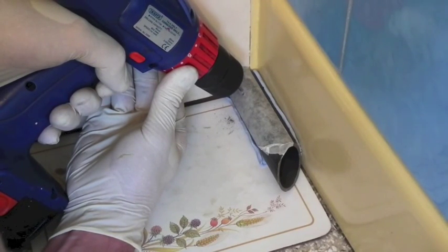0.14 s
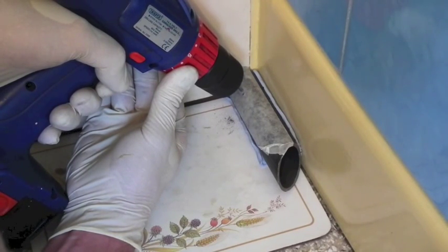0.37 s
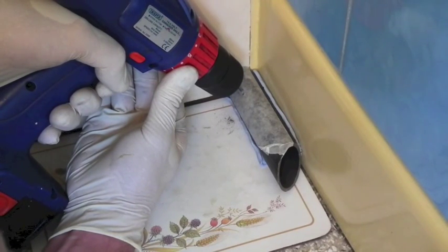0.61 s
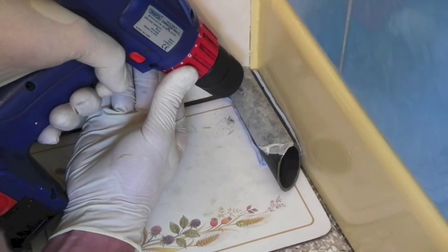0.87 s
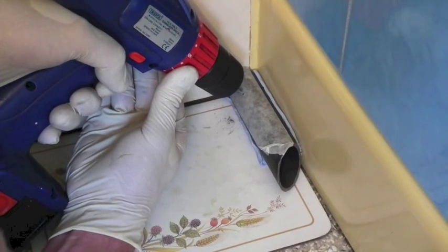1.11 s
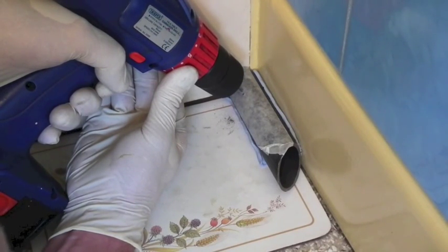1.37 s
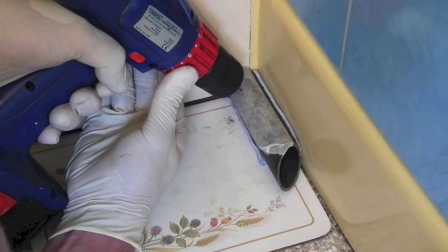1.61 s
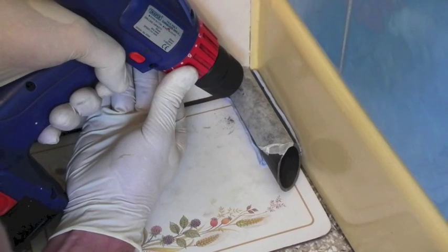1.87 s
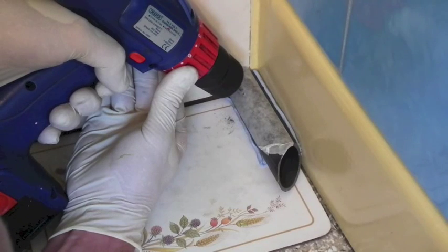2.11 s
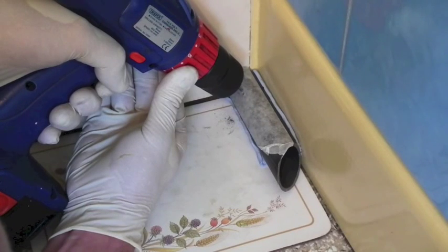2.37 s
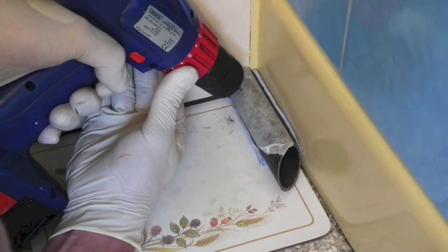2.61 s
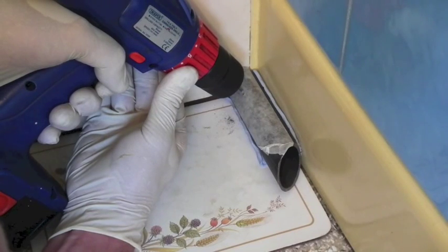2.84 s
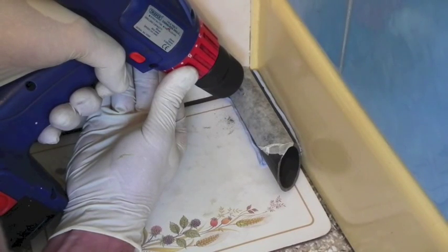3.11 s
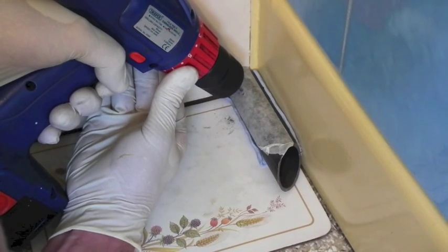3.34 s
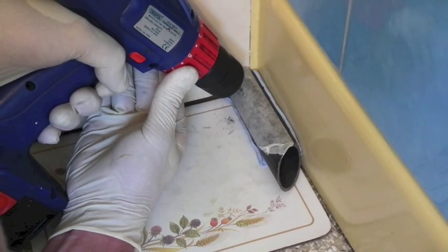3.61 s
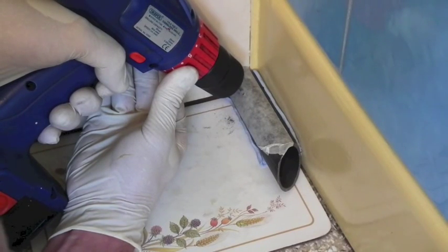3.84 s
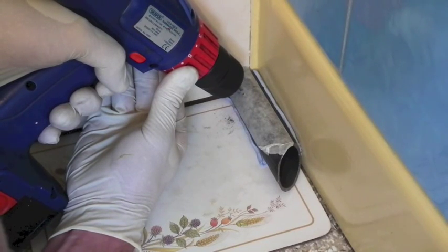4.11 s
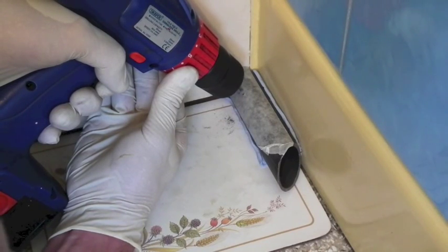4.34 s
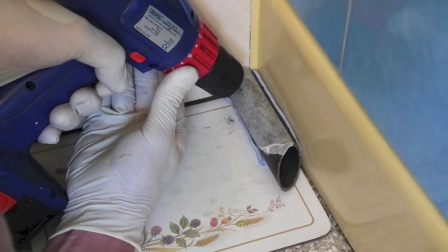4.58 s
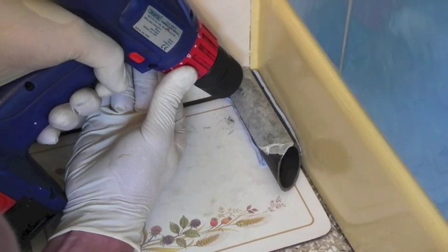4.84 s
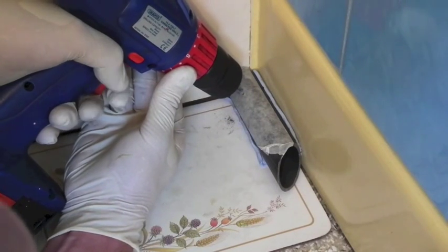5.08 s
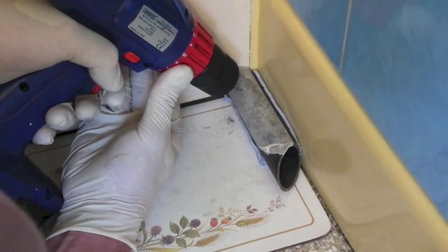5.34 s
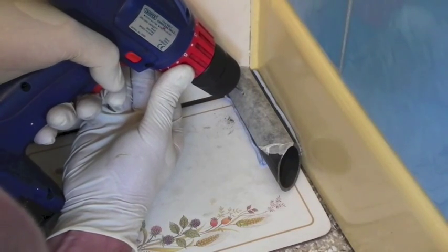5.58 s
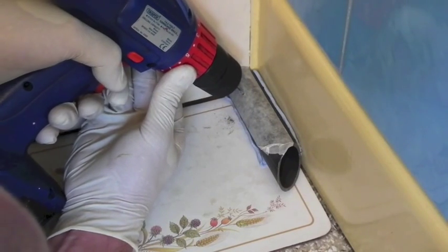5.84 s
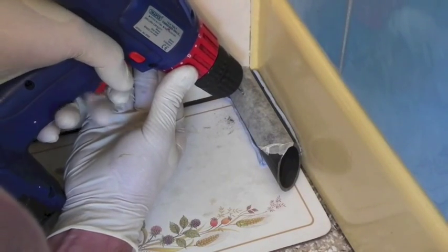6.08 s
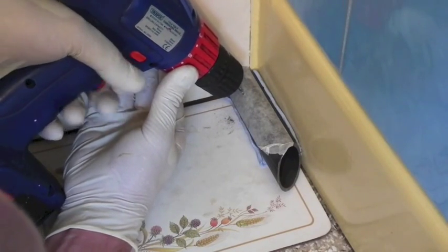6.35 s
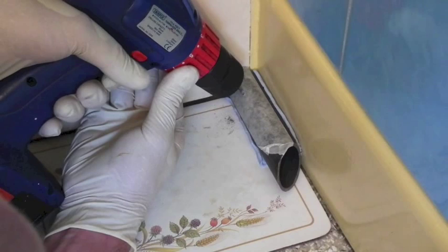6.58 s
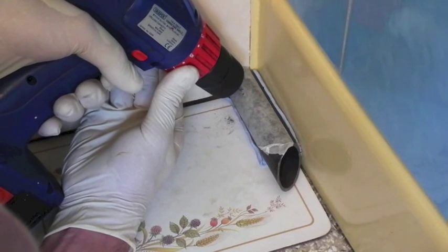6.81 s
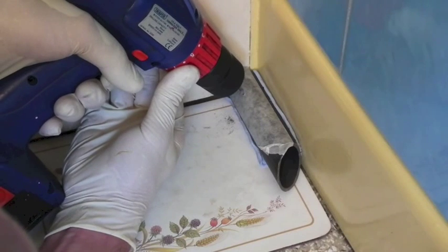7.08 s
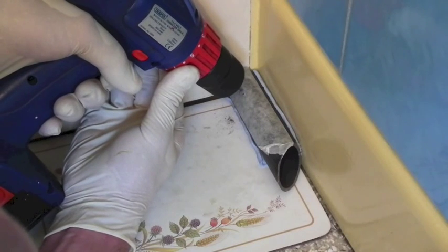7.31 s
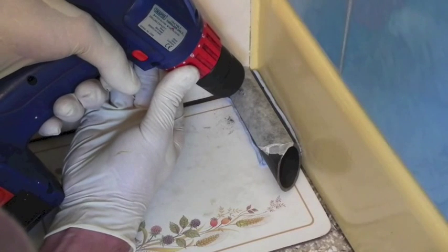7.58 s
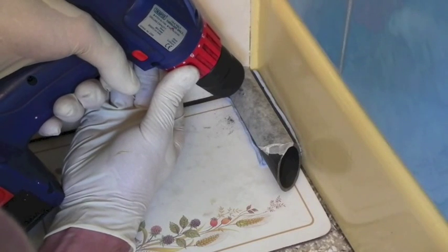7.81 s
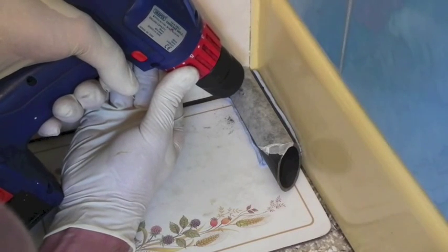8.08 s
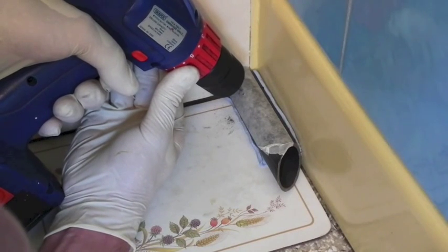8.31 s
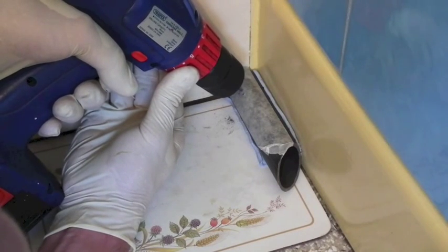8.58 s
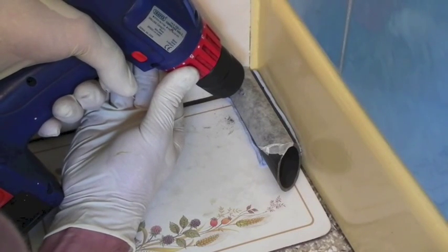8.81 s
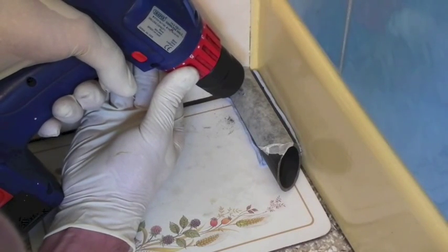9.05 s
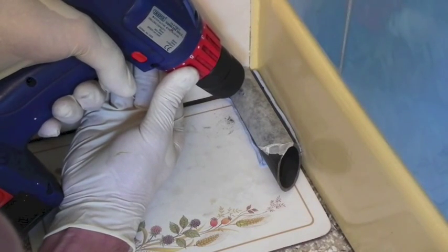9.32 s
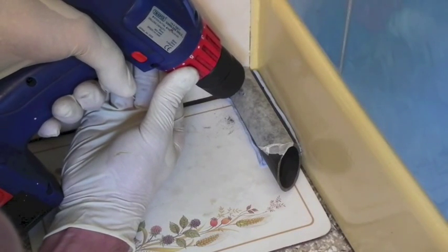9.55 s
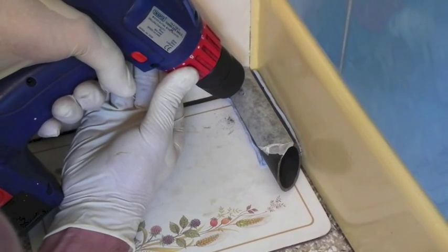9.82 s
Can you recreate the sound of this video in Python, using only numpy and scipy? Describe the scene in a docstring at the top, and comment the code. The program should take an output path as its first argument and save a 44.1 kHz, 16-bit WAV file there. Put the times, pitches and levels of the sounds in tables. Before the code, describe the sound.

Very close to the microphones, a handheld drill whirs with harsh, slightly wavering whine and hissing metallic chatter. It is released, its pitch falling for over a second as loose gears knock and clatter, until it almost stops. Rubber gloves rustle, a finger snaps the trigger, and the motor stumbles up with a short groan before running steadily again, a touch lower near the end. Small hard room, short dense reflections.

```python
"""Cordless drill stopping and restarting

A cordless drill whines steadily into a steel tube on a tray in a small tiled room, close to two microphones.
The trigger is let go, the motor coasts down, a gloved finger clicks the switch, and the drill spins up again.
Random ticks, wavering tones and rotor snaps follow one shaft speed and ring through the housing.
Shaped noise makes the rubbing gloves and the low rumble; clicks are bursts of noise with ringing thuds."""
import sys
import numpy as np
from scipy import signal
from scipy.fft import rfft, irfft, next_fast_len
from scipy.io import wavfile

SR = 44100
rng = np.random.default_rng(int(sys.argv[2]) if len(sys.argv) > 2 else 0)


def unload_wav(signal):
    """Save mono or channel-first audio to the path in sys.argv[1] as 16-bit WAV at rate SR, clipped to [-1, 1]."""
    wavfile.write(
        sys.argv[1],
        SR,
        np.round(np.clip(np.atleast_2d(signal).T, -1, 1) * 32767).astype(np.int16),
    )


def boost_factor(decibels):
    """Convert a level in decibels to a linear amplitude factor."""
    exponent = np.asarray(decibels, float) / 20
    return 10 ** exponent


N = 437913
T = np.arange(N) / SR  # time in seconds
SIZE = next_fast_len(N + SR)
HZ = np.maximum(np.arange(SIZE // 2 + 1) * SR / SIZE, 1)  # pitch of every frequency bin
RESTART_S = 6.455  # the trigger is pulled again


def unit(x):
    """Scale to an rms of 1."""
    return x / np.sqrt(np.mean(x ** 2))


def over_hz(points):
    """Spread (Hz, dB) points over every frequency bin, along a logarithmic pitch scale."""
    hz, db = np.array(points).T
    return np.interp(np.log(HZ), np.log(hz), db)


def through(x, response):
    """Filter by a frequency response."""
    return irfft(rfft(x, SIZE) * response, SIZE)[..., :N]


def causal(db):
    """The response with these gains that rings only after a blow."""
    cepstrum = irfft(np.log(boost_factor(db)), SIZE)
    cepstrum[1:SIZE // 2] *= 2
    cepstrum[SIZE // 2 + 1:] = 0
    return np.exp(rfft(cepstrum))


def walk(rate):
    """Smooth random drift that changes about rate times a second, with an rms of 1."""
    at = T * rate
    levels = rng.standard_normal(1500)
    step = at.astype(int) % 1499
    ease = .5 - .5 * np.cos(np.pi * (at % 1))
    return unit(levels[step] * (1 - ease) + levels[step + 1] * ease)


def ring(modes):
    """The sum of dying sines that one blow leaves, over a quarter of a second."""
    t = T[:SR // 4]
    return sum(boost_factor(db - 60 * t / t60) * np.sin(2 * np.pi * hz * t) for hz, db, t60 in modes)


def swell(start_s, rise_s, hold_s, fall_s):
    """Rise from 0 to 1, hold, fall back."""
    return np.interp(T, np.cumsum([start_s, rise_s, hold_s, fall_s]), [0, 1, 1, 0])


def moving(speed, knee_hz):
    """Gain that falls 12 dB an octave under the knee speed."""
    return speed ** 2 / np.sqrt(speed ** 4 + knee_hz ** 4)


def shaft():
    """Turns per second: full speed, a coast slowed by drag and dry friction, then a quick spin-up."""
    # it tires slowly, drops a step as the bit bites deeper, and never runs quite evenly
    full_hz, tire_hz_per_s, wander_hz = 308.2, .08, .25
    bite_s, bite_hz = 9.0, 1.4
    bite = bite_hz * np.clip((T - bite_s) / 0.256, 0, 1)
    full = full_hz - tire_hz_per_s * T - bite + wander_hz * (walk(1.5) + walk(9))

    # drag grows with speed, dry friction does not; the last turns creep
    release_s, drag_s, friction_hz_per_s, creep_hz = 4.96, 2.4, 221, 14
    rest = friction_hz_per_s * drag_s
    coast = (full + rest) * np.exp(-np.maximum(T - release_s, 0) / drag_s) - rest
    coast = creep_hz * np.logaddexp(0, coast / creep_hz)

    # The spin-up stumbles as the gears take load.
    # Each row: seconds after the trigger, share of full speed.
    spin_points = [(0, 0), (.028, .25), (.053, .34), (.073, .46), (.098, .65), (.123, .76), (.183, .92),
                   (.27, 1)]
    spin_up = full * np.interp(T - RESTART_S, *np.array(spin_points).T)
    return np.maximum(coast, spin_up)


def effort(speed):
    """Gains of rattle, knocks, cogging and clatter from speed, trigger and snatching gears."""
    # Moments at which the gears snatch.
    # Each row: start in seconds, hold in seconds, rattle, knock and cogging gain in dB.
    snatches = [(5.35, .01, 1, 5, 2), (5.445, .025, 1, 8, 5), (5.625, .02, 1.5, 9, 5), (5.69, .09, 1, 8, 1),
                (6.445, .005, -5, 11, -2), (6.475, .042, 3, 6, -4), (6.55, .03, 0, 6, 0)]
    rattle_db, knock_db, cogging_db = sum(np.outer(gains_db, swell(s, 0.036, hold_s, 0.0064))
                                          for s, hold_s, *gains_db in snatches)
    slack = 1 - speed / speed.max()  # 0 at top speed, 1 at rest
    pulling = T > RESTART_S
    rattle_knee_hz, knock_knee_hz, cogging_knee_hz = 39.3, 9.3, 120

    # slow unloaded gears rattle less; after the restart a lift cancels that cut
    unloaded_db, restart_lift_db = -4.5, 4.5
    tick_db = -19.5 + (restart_lift_db * pulling + unloaded_db) * slack + rattle_db
    ticks = boost_factor(tick_db) * moving(speed, rattle_knee_hz)
    # backlash opens as the gears slow
    backlash_db = 15
    knocks = boost_factor(-51.5 + backlash_db * slack + knock_db) * moving(speed, knock_knee_hz)
    # rubbing gloves also feed the knocks
    knocks = knocks + boost_factor(-2) * handling()
    # cogging grows as a power of the speed lost
    snaps = boost_factor(-25.5 + cogging_db) * slack ** .8 * moving(speed, cogging_knee_hz)
    clatter = boost_factor(-27.5 + rattle_db) * np.sqrt(slack) * moving(speed, rattle_knee_hz)
    return ticks, knocks, snaps, clatter


def drill():
    """Everything that turns shares the housing resonances; rows are what both ears share and what differs."""
    # Overall tone of the drill. Each row: pitch in Hz, relative level in dB.
    colour = [(30, -44), (100, -26), (170, -18.5), (260, -28.5), (400, -12), (1000, -12.5), (2200, -8.5),
              (3600, -1.5), (5000, -10), (6500, -4.5), (7800, -11.5), (8700, -23), (11500, -13.5),
              (15500, -25)]
    # Resonances of housing and tube. Each row: pitch in Hz, width in Hz, boost in dB.
    housing = [(306, 32, 5), (581, 15, 4.5), (883, 15, 4), (1246, 27, 5), (1784, 190, 4), (2705, 40, 6),
               (3490, 690, 2), (3810, 80, 2), (4156, 78, 6), (4515, 290, 3.5), (5740, 65, 6),
               (10250, 250, 4), (645, 39, -6), (2823, 130, -5.5), (3520, 50, 5.5), (3930, 96, -2.5)]
    # Tone of the cogging. Each row: pitch in Hz, level in dB.
    cogging_colour = [(275, -27), (315, -1), (560, 2), (740, -1), (870, 7), (1150, -9), (4500, -28),
                      (4850, -3), (5300, -3), (5900, -17), (9000, -24), (11000, -13)]
    speed = shaft()
    turns = np.cumsum(speed) / SR
    tick_gain, knock_gain, snap_gain, clatter_gain = effort(speed)

    boost_db = sum(db / (1 + (2 * (HZ - hz) / w) ** 2) for hz, w, db in housing)
    housing_db = over_hz(colour) + boost_db
    housing_db = housing_db - 10 * np.log10(np.mean(boost_factor(2 * housing_db)))  # mean power 1

    teeth = rattle(speed, turns)
    bright = through(tick_gain * teeth + whine(speed, turns, housing_db), causal(housing_db))
    # backlash knocks are blunter than tooth ticks
    blunt = causal(boost_db) / (1 + (HZ / 1100) ** 4) / (1 + (330 / HZ) ** 4)
    blunt = blunt / np.sqrt(np.mean(np.abs(blunt) ** 2))
    knocks = through(knock_gain * teeth, blunt)
    snaps = through(snap_gain * cogging(turns), causal(over_hz(cogging_colour) + boost_db))
    return bright + knocks + snaps + loose_gears(clatter_gain * teeth)


def rattle(speed, turns):
    """Gear teeth, brushes and the cutting edge tick at random over hiss, fewer as the shaft slows; two rows."""
    # How fast the rattle throbs, as multiples of the shaft rate.
    throb_orders = [1, 5 / 12, 7 / 12, .07, .027]
    # Throb depth in dB, one for each multiple.
    throb_depths = [1.1, 0.6, 0.92, 0.26, 0.072]
    rate = 1200 + 25 * speed  # ticks per second
    scatter_db, hiss = 2.0, 0.72
    chance, sign, size = rng.random(size=(3, 2, N))
    ticks = (chance < rate / SR) * np.sign(sign - .5) * boost_factor(-scatter_db * np.log(1 - size))
    x = unit(ticks / np.sqrt(rate)) + hiss * rng.standard_normal(size=(2, N))

    throb_db = sum(db * np.sin(2 * np.pi * k * turns) for k, db in zip(throb_orders, throb_depths))
    throb_db = throb_db + 0.16 * walk(9) + 0.5 * walk(35)
    x = unit(x * boost_factor(throb_db))

    edge_hz, bass_hz = 7000, 290
    dull_db, thin_db = 8, 40  # cuts with the shaft at rest
    treble = through(x, 1 / (1 + (edge_hz / HZ) ** 6))
    bass = through(x, 1 / (1 + (HZ / bass_hz) ** 6))
    slack = 1 - speed / speed.max()
    # the treble dulls in the coast only; the bass thins whenever the shaft is slow
    duller = treble * (boost_factor(-dull_db * slack * (T < RESTART_S)) - 1)
    thinner = bass * (boost_factor(-thin_db * slack) - 1)
    return x + duller + thinner


def whine(speed, turns, housing_db):
    """Shaft, gear-mesh and commutator tones swell and slip by chance, and weaken without current or speed."""
    # Pitch of each tone as a multiple of the shaft rate.
    whine_orders = [5 / 12, 1, 2, 3, 5, 25 / 4, 15 / 2, 35 / 4, 15, 21, 35.92, 15 / 8, 3.08, 15 / 4, 35 / 6,
                    6, 95 / 12, 9]
    # The same tones at full speed.
    # Each row: level in dB before the stop, level in dB in the new grip after it,
    # unsteadiness in Hz, size of the steady part against the wavering part.
    whine_tones = [(-52.5, -52.5, 6.8, 4.6), (-43, -41.5, 8, 6.9), (-46, -55, 12, 7.5),
                   (-41, -49.5, 14, 3.4), (-40, -37, 18, 1.8), (-44, -36.5, 45, 0.5),
                   (-38.5, -35.5, 60, 0.5), (-43.5, -37, 40, 1.7), (-36.5, -36, 30, 2.5),
                   (-34.5, -32.5, 25, 3.5), (-36, -38.5, 30, 2.5), (-53, -48.5, 9.5, 1.5),
                   (-46, -46.5, 20, 0.91), (-47, -48.5, 14, 1.8), (-47, -45, 14, 1.8), (-48, -47, 16, 2.1),
                   (-55, -45, 14, 1.3), (-51, -47, 17, 1.7)]
    pause_s, fade_db = 6.2, 14
    out = 0
    for k, (first_db, second_db, unsteady_hz, steady) in zip(whine_orders, whine_tones):
        db = np.where(T < pause_s, first_db, second_db)
        phase = 2 * np.pi * k * turns
        sway = [(steady + walk(unsteady_hz)) * np.sin(phase + side) + walk(unsteady_hz) * np.cos(phase + side)
                for side in (0, np.pi / 2)]
        # take off what the housing will add at this pitch
        level = boost_factor(db - np.interp(k * speed.max(), HZ, housing_db))
        out = out + level * unit(np.array(sway))

    # full current stops, and flows again once the trigger is fully in
    current_off_s, current_on_s, switch_s, idle_db = 5.01, 6.708, .012, -8
    idle = swell(current_off_s, switch_s, current_on_s - current_off_s - switch_s, switch_s)
    return out * boost_factor(idle_db * idle - fade_db * (1 - speed / speed.max()))


def rumble():
    """Bench and room drone: noise in a few low resonances, with short bumps and longer swells."""
    # Low resonances. Each row: pitch in Hz, width in Hz, relative level in dB.
    low_modes = [(55, 22, -4), (86, 16, -0.5), (130, 22, -8), (171, 27, -3), (223, 28, -1), (318, 40, -2)]
    # Bumps of the drone that die away. Each row: start in seconds, level in dB, seconds to die by 60 dB.
    drone_bumps = [(5.605, -51, .7), (6.08, -56, 0.68), (6.405, -35, 0.54), (6.45, -30, 0.23),
                   (6.71, -40, 0.4)]
    # Spans in which the drone comes through louder. Each row: start in seconds, hold in seconds, level in dB.
    drone_spans = [(5.6, 0.91, -50), (6.7, 0.33, -56)]
    drone_db, rise_s = -68, 0.016
    gain = sum(boost_factor(2 * db) / (1 + (2 * (HZ - hz) / w) ** 4) for hz, w, db in low_modes)
    drone = unit(through(rng.standard_normal(size=(2, N)), np.sqrt(gain)))
    bumps = sum(boost_factor(db - 60 * np.maximum(T - s, 0) / t60) * np.clip((T - s) / rise_s, 0, 1)
                for s, db, t60 in drone_bumps)
    swells = sum(boost_factor(db) * swell(s, rise_s, hold_s, 0.24) for s, hold_s, db in drone_spans)
    return (boost_factor(drone_db) + swells + bumps) * drone


def room():
    """Direct sound plus a short dense echo off the tiles, another for each ear, with less bass."""
    t60_s, echo_db = .15, -12
    t = T[:SR // 2]
    tail = rng.standard_normal(size=(2, len(t))) * boost_factor(-60 * t / t60_s) * (t > .002)
    echo = rfft(tail / np.sqrt(np.sum(tail ** 2, axis=1, keepdims=True)), SIZE)
    return 1 + boost_factor(echo_db) * echo / (1 + 900 / HZ)


def cogging(turns):
    """The three-pole rotor snaps past its magnets: fluttering tones at multiples of the shaft rate."""
    # Pitch of each tone as a multiple of the shaft rate.
    cog_orders = [3, 6, 9, 12, 24]
    # Level of each tone in dB, before the housing and the overall cogging gain.
    cog_levels = [2.5, -1.5, 0, -4, 10.5]
    flutter_db, slip = 2.6, .9  # slip in radians
    return sum(boost_factor(db + flutter_db * walk(28)) * np.sin(2 * np.pi * k * turns + slip * walk(45))
               for k, db in zip(cog_orders, cog_levels))


def loose_gears(clatter):
    """Slack teeth clatter and slap, ringing a few broad resonances; the housing groans as the motor takes load."""
    # What unloaded gear teeth ring with. Each row: pitch in Hz, width in Hz, relative level in dB.
    gear_modes = [(2680, 120, 2), (3480, 350, 4), (3880, 250, 3), (4300, 350, 2), (5250, 350, -1),
                  (5760, 200, 1)]
    # Single slaps of the backlash. Each row: time in seconds, level in dB.
    slap_times = [(5.2607, -9), (5.3181, -9), (5.412, -6), (5.476, -8), (5.5, -9), (5.6743, -6),
                  (5.745, -8), (5.7995, -10), (5.929, -13), (5.9945, -19), (6.0168, -22), (6.4862, -10)]
    # Sharp ring of a slap. Each row: pitch in Hz, level in dB, seconds to die by 60 dB.
    slap_modes = [(3600, 10, .002)]
    # The groan: start in seconds, hold in seconds, level in dB, pitch in Hz, width in Hz.
    groan_row = (6.455, .06, -28, 1220, 160)
    power = sum(boost_factor(2 * db) / (1 + ((HZ / hz - hz / HZ) * hz / w) ** 2) for hz, w, db in gear_modes)
    rings = causal(10 * np.log10(power))
    rings = rings / np.sqrt(np.mean(np.abs(rings) ** 2))

    slaps = np.zeros(N)
    for s, db in slap_times:
        slaps[int(s * SR)] = -boost_factor(db)
    start_s, hold_s, groan_db, hz, w = groan_row
    groan = unit(through(rng.standard_normal(N), 1 / (1 + (2 * (HZ - hz) / w) ** 2)))
    groan = boost_factor(groan_db) * swell(start_s, 0.018, hold_s, .015) * groan
    sharp = signal.fftconvolve(slaps, np.diff(ring(slap_modes)))[:N] + groan
    # the second row holds less: slaps and groan come mostly from the middle
    return through(clatter + np.array([[1], [.5]]) * slaps, rings) + np.array([[1], [.3]]) * sharp


def handling():
    """How hard gloves and sleeves rub in the pause."""
    # Each row: start in seconds, swell in seconds, hold in seconds, level in dB.
    rubs = [(5.85, 0.19, 0.4, -46.5), (6.117, 0.12, 0.061, -43.5), (6.328, 0.087, 0.046, -39)]
    return sum(boost_factor(db) * swell(s, swell_s, hold_s, .04) ** 2 for s, swell_s, hold_s, db in rubs)


def rustle():
    """Cloth and rubber rub in small uneven grains: noise of quickly changing strength."""
    # Tone of the rubbing. Each row: pitch in Hz, relative level in dB.
    rustle_colour = [(300, -6), (900, -9), (1500, -10), (3000, 1), (7000, -6), (11000, -6), (15500, -9)]
    grains = rng.standard_normal(size=(2, N)) * boost_factor(1.5 * walk(160))
    return handling() * unit(through(grains, boost_factor(over_hz(rustle_colour))))


def switch():
    """Each click of finger and switch is a short bright crack and a hollow thud of the plastic shell."""
    # Each row: time in seconds, crack level in dB before the shared crack gain, thud level in dB.
    clicks = [(6.1834, -39, -32), (6.2218, -17.5, -20.5), (6.2916, -33, -34), (6.4037, -16, -30.5),
              (6.4115, -18, -35), (6.4433, -29, -40), (6.4618, -21, -36)]
    # Tone of the crack. Each row: pitch in Hz, relative level in dB.
    crack_colour = [(800, -10), (1700, -5), (2600, 3), (4000, -2), (6700, 7), (11000, -14), (15500, -6)]
    # Ringing of the shell. Each row: pitch in Hz, level against the thud in dB, seconds to die by 60 dB.
    shell_modes = [(399, -10, 0.14), (585, 1.5, 0.14), (658, -3, 0.15), (720, -13, 0.1), (1150, -5, .03),
                   (2490, -9, 0.046)]
    crack_gain_db, crack_t60_s, push_s = -4, 0.014, .0015
    crack, thud = np.zeros(N), np.zeros(N)
    for s, crack_db, thud_db in clicks:
        fading_db = crack_db + crack_gain_db - 60 * np.maximum(T - s, 0) / crack_t60_s
        crack += boost_factor(fading_db) * (T >= s)
        thud[int(s * SR)] = boost_factor(thud_db)
    colour = causal(over_hz(crack_colour))
    colour = colour / np.sqrt(np.mean(np.abs(colour) ** 2))
    cracks = through(crack * rng.standard_normal(N), colour)
    # the thud swells in over a brief push
    shell = ring(shell_modes) * np.minimum(T[:SR // 4] / push_s, 1)
    return cracks + signal.fftconvolve(thud, shell)[:N]


def scene():
    """Drill, switch, gloves and rumble, spread between the ears, in the room."""
    # Balance of the ears. Each row: pitch in Hz, left over right in dB.
    ear_balance = [(60, -1), (110, -1), (200, -2), (380, -3.5), (700, -2.5), (1290, -3), (2380, 0),
                   (4400, 2), (8120, 5.5), (15000, -0.5)]
    # What differs left and right, against what both share. Each row: pitch in Hz, level in dB.
    sideways = [(60, -20), (110, -44), (200, -14), (380, -23), (700, -11), (1290, -8), (2380, -1.5),
                (4400, -4), (8120, -2.5), (15000, -2)]
    mid, side = drill() + rumble() + rustle() + np.array([[1], [.3]]) * switch()
    # part of the sideways sound is the shared sound arriving a quarter cycle out of step
    share = .16
    side = np.sqrt(1 - share) * side + np.sqrt(share) * through(mid, 1j)
    sign = np.array([[1], [-1]])
    ears = mid + sign * through(side, boost_factor(over_hz(sideways)))
    return through(ears, room() * boost_factor(sign * over_hz(ear_balance) / 2))


def band_limit(x):
    """A steep low-pass at the top of the band."""
    return signal.sosfilt(signal.butter(12, 16470, fs=SR, output="sos"), x)


def record(dry):
    """The loudest peaks are rounded and a few treble bands drop out."""
    # Bands that drop out. Each row: lower edge in Hz, upper edge in Hz, depth in dB.
    gaps = [(7980, 8290, 43), (9100, 9350, 27), (11756, 13200, 45), (15400, 16300, 14), (15900, 17000, 60)]
    gain_db = -sum(db / (1 + ((2 * HZ - lo - hi) / (hi - lo)) ** 12) for lo, hi, db in gaps)
    rounded = np.tanh(1.121 * dry) / 1.113
    mix = through(rounded, boost_factor(gain_db))
    return band_limit(mix)


dry = scene()
out = record(dry)
unload_wav(out)
```